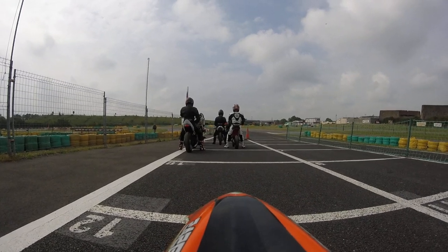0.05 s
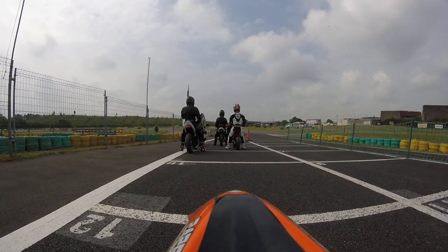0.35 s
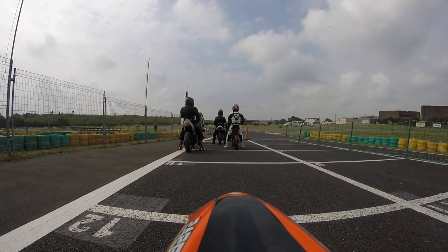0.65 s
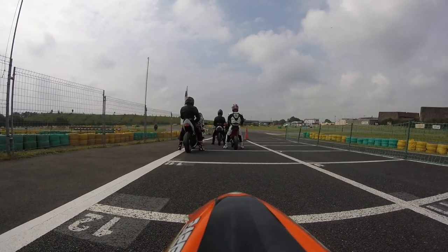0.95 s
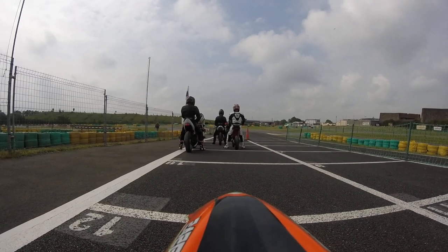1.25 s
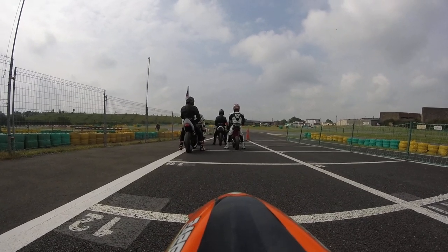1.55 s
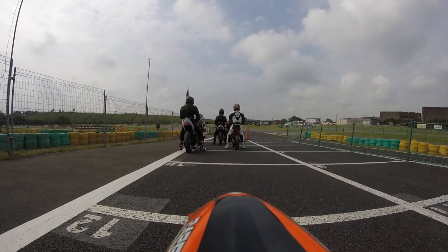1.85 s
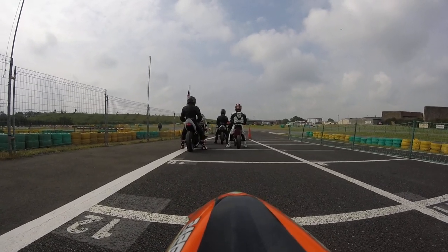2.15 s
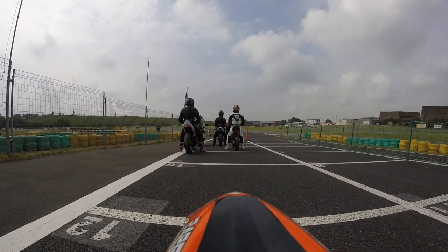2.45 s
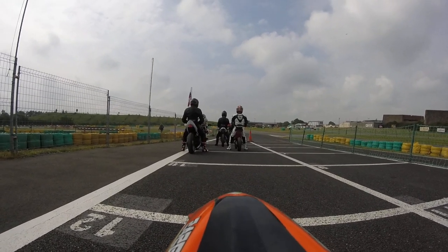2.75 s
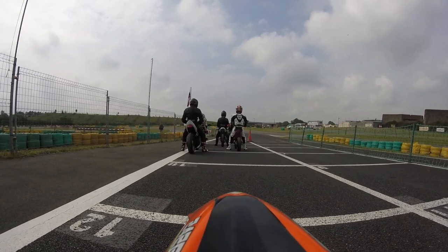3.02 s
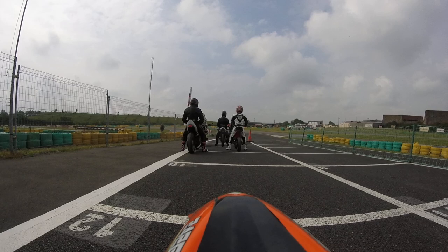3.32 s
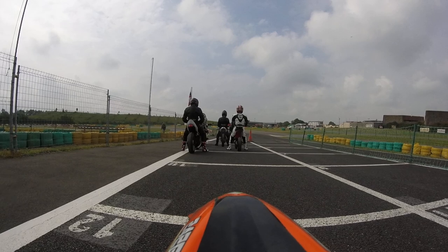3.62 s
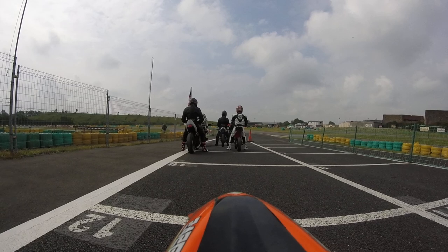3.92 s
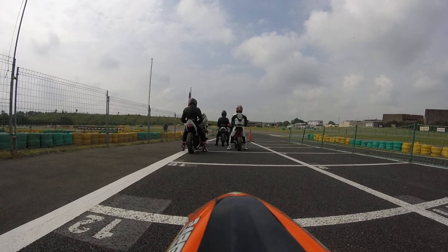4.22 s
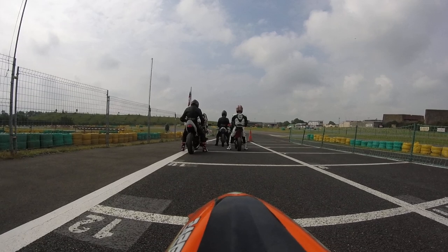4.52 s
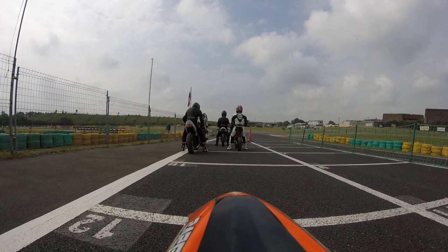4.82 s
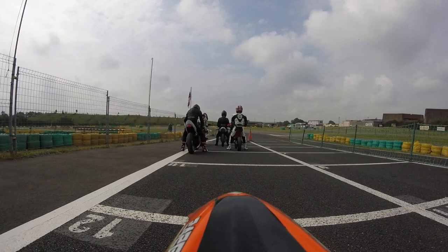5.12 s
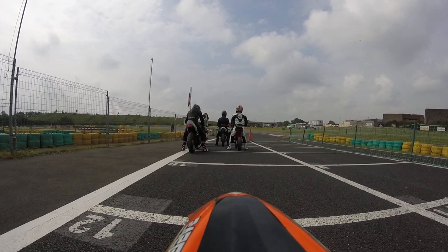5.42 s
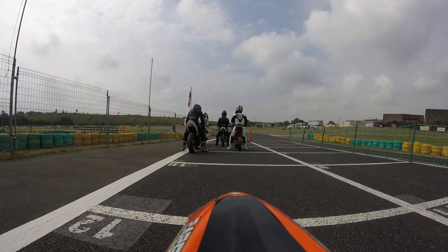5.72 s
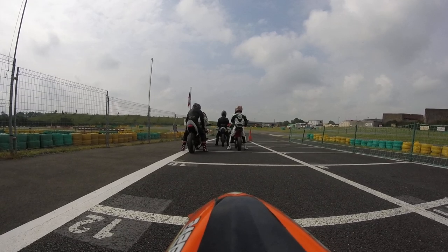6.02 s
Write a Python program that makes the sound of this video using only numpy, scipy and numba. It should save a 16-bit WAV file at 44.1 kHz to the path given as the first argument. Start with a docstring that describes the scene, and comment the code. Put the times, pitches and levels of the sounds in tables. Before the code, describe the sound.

A small one-cylinder motorcycle engine runs very close, heard from its front shell on an outdoor starting grid. Its idle is a fast metallic clatter with puffing exhaust and a low throb. At about 0.2 seconds comes the strongest rev: air rushes in, the pitch climbs and the bodywork booms, briefly pushing the other sounds down. As the revs fall, a short, thin hiss swells and stops at around 1 second. A light throttle blip follows at 1.4 seconds and a somewhat stronger one at 1.8 seconds, each with a low swell. By about 3 seconds the engine has dropped back to idle, and it keeps rattling and puffing evenly until the end at about 6 seconds. Throughout, a few other motorcycles putter more softly a short way ahead, each at its own slightly wandering speed.

```python
"""Pit bike on a starting grid

A small one-cylinder four-stroke bike idles and is revved three times; other bikes idle ahead.
Its valves and piston clatter, its exhaust puffs, and its shaking makes the fairing (the front
shell) boom. The limiter of a camera on that fairing turns everything down during the booms."""
import sys
import numpy as np
from scipy import signal
from scipy.fft import rfft, irfft, next_fast_len
from scipy.io import wavfile
from scipy.ndimage import uniform_filter1d, minimum_filter1d, map_coordinates
from numba import njit

SR = 44100
rng = np.random.default_rng(int(sys.argv[2]) if len(sys.argv) > 2 else 0)


def wav_record(signal):
    """Record a signal, one row per channel, as 16-bit PCM in the file named by sys.argv[1]."""
    frames = np.transpose(np.atleast_2d(signal))
    bounded = np.clip(frames, -1, 1)
    # unit amplitude maps onto the largest positive 16-bit level
    quanta = np.round(bounded * 32767).astype(np.int16)
    wavfile.write(sys.argv[1], SR, quanta)


N = 267687
IDLE_HZ = 48  # usual idle in turns per second; "revs" is the speed divided by this


def amp(db):
    """Turn decibels into a gain."""
    return 10 ** (np.asarray(db) / 20)


def unit(x):
    """Scale x to an average (rms) level of 1."""
    return x / np.sqrt(np.mean(x ** 2) + 1e-20)


def clock():
    """Each sample's time in seconds."""
    return np.arange(N) / SR


def curve(rows):
    """Join (seconds, value) points with straight lines."""
    return np.interp(clock(), *np.transpose(rows))


def lagged(x, seconds):
    """Follow x smoothly, a little late."""
    keep = np.exp(-1 / (seconds * SR))
    return signal.lfilter([1 - keep], [1, -keep], x)


def fading(impulses, decay):
    """Give each impulse a tail that falls 20 dB in decay seconds."""
    return signal.lfilter([1], [1, -10 ** (-1 / (decay * SR))], impulses)


def shaped(x, gain):
    """Filter x by gain(Hz), so that ringing comes after a hit, never before."""
    size = 2 * next_fast_len(N // 2 + SR // 4)
    hz = np.fft.rfftfreq(size, 1 / SR)
    cepstrum = irfft(np.log(np.maximum(gain(hz), 1e-6)))
    cepstrum[1:size // 2] *= 2
    cepstrum[size // 2 + 1:] = 0
    return irfft(rfft(x, size) * np.exp(rfft(cepstrum)))[:N]


def coloured(x, points):
    """Filter x along (Hz, dB) points; the result has level 1."""
    freqs, db = np.transpose(points)
    return unit(shaped(x, lambda hz: amp(np.interp(np.log(hz + 1), np.log(freqs), db))))


def ringing(x, modes):
    """Let x ring (Hz, width in Hz, dB) resonances; the result has level 1."""
    def gain(hz):
        peaks = (amp(db) / (1 + (2 * (hz - centre) / width) ** 2) for centre, width, db in modes)
        return np.sqrt(sum(peak ** 2 for peak in peaks))
    return unit(shaped(x, gain))


def firings(turns, offset, uneven_db, scatter_db):
    """One impulse every second turn, offset turns after firing; strong and weak ones alternate."""
    cycles = (turns - 1 - offset) / 2
    at = np.flatnonzero(np.diff(np.floor(cycles)) > 0)
    strong = np.cos(np.pi * cycles[at])
    return np.bincount(at, amp(uneven_db * strong + scatter_db * rng.standard_normal(len(at))), N)


def other_bikes():
    """Three engines putter ahead, each at its own wandering speed, blurred by distance."""
    # Their tone from behind. Each row: frequency in Hz, relative level in dB.
    tone = [(30, -33), (110, -14), (280, -11), (550, 13), (800, -24.5), (1250, -6.5), (1900, -33),
            (2600, -9), (5000, -31), (14000, -58.5)]
    total = np.zeros(N)
    for idle_hz in (51, 57, 63):
        drift = map_coordinates(rng.standard_normal(16), [clock() * 2])
        turns = np.cumsum(idle_hz * (1 + .03 * drift)) / SR
        pops = firings(turns, 0, uneven_db=-5.5, scatter_db=-0.5)
        total += amp(17) * pops + fading(pops, decay=.06) * rng.standard_normal(N)
    return amp(-35.5) * coloured(total, tone)


def hiss():
    """A short, thin hiss swells and stops as the first rev dies away."""
    # The hiss's tone. Each row: frequency in Hz, relative level in dB.
    tone = [(30, -100), (5000, -32), (5800, 1.5), (6700, -4), (8300, -6.5), (9500, -19.5), (14000, -25)]
    level_db = curve([(.8, -88), (.93, -57), (1.03, -47.5), (1.07, -66), (1.12, -100)])
    return amp(level_db) * coloured(rng.standard_normal(N), tone)


def crank(twist_s=.04, flywheel_s=.3, full_pull_hz=210):
    """Each twist of the grip opens the throttle; the heavy flywheel speeds up late, then coasts."""
    # The twists. Each row: start in seconds, seconds until let go, opening from 0 to 1.
    twists = [(0.188, 0.108, 0.922), (1.399, 0.163, 0.325), (1.84, 0.189, 0.524)]
    # Speed with the throttle shut, sagging after revs. Each row: time in seconds, turns per second.
    idle = [(0.0, 46.78), (0.99, 41.94), (1.19, 37.59), (1.58, 45.74), (1.85, 35.84), (2.4, 40.33),
            (2.7, 40.21), (2.78, 45.93), (3.0, 43.33), (3.55, 46.02), (3.72, 44.75), (4.04, 49.08),
            (4.54, 47.17), (5.12, 49.64), (5.34, 47.19), (5.6, 48.49), (6.07, 46.72)]
    throttle = sum(opening * np.interp(clock() - start, [0, twist_s, held, held + twist_s], [0, 1, 1, 0])
                   for start, held, opening in twists)
    speed = curve(idle) + full_pull_hz * lagged(throttle, flywheel_s)
    return throttle, speed


def intake(throttle):
    """Air roars through the airbox while the throttle is open."""
    return amp(-27) * throttle * ringing(rng.standard_normal(N), [(198, 92, -2), (302, 130, 0)])


def exhaust(turns, throttle, pop_db=23.5, flow_db=-11, rush_db=3.5):
    """Each firing gives a pop and a puff of swirling gas; an open throttle swells the puffs."""
    # Pipe and bodywork resonances. Each row: pitch in Hz, width in Hz, level in dB.
    pipe = [(150, 54, -17.5), (234, 28, -14), (301.1, 34.7, -8), (338, 180, -13), (427.1, 40.2, 1.5),
            (522, 86, -13), (621, 121, -17), (897.5, 81, -15), (1148, 175, -19), (1615, 78, -17.5)]
    pops = firings(turns, -.05, uneven_db=.4, scatter_db=.7)
    puffs = (fading(pops, decay=0.076) + amp(flow_db)) * rng.standard_normal(N)
    return ringing(amp(pop_db) * pops + amp(rush_db * throttle) * puffs, pipe)


def clatter(turns, knock_db, revs, level, dull_hz=2900):
    """Valves and piston strike the case at fixed points in each cycle, over whirring chain and gears."""
    # The hits. Each row: turns after firing, level in dB, fade in seconds, hardness from 0 to 1.
    hits = [(-.48, 3.5, .004, .1), (-.35, 6, .003, 0.03), (-.21, -8.5, 0.002, 0.53), (-.11, 2, 0.011, 0.6),
            (0.15, -11.5, 0.082, 1), (0.66, -4.5, 0.017, 0.55), (0.851, -8, 0.0028, 0.1)]
    # Resonances of the case and of the piston. Each row: pitch in Hz, width in Hz, level in dB.
    case_modes = [(1225, 252, -11.5), (1631, 123, -8.5), (2190, 144, -6), (2424, 170, 1), (2716, 106, 2.5),
                  (2811, 173, -3), (3080, 185, -10), (3585, 65, -14.5), (3998, 594, -18),
                  (4970, 200, -26.5), (5850, 530, -34.5), (6450, 620, -36), (7500, 1700, -46),
                  (9600, 2700, -51.5)]
    piston_modes = [(2354, 157, 5), (2758, 170, 1.5), (3205, 210, -1), (4074, 623, -20)]
    hard, soft = amp(-18), amp(-14)  # the steady whirr
    for offset, db, decay, hardness in hits:
        blow = amp(db) * fading(firings(turns, offset, uneven_db=-0.3, scatter_db=2.2), decay)
        hard += hardness * blow
        soft += (1 - hardness) * blow
    # the piston slaps the cylinder wall just before firing, harder at low speed, and rattles briefly
    slaps = amp(8.5) * revs ** -0.8 * firings(turns, -0.155, uneven_db=1.5, scatter_db=0.56)
    slaps += amp(-7) * fading(slaps, decay=0.0062) * rng.standard_normal(N)
    # soft hits leave the highest resonances alone
    lowpass = signal.butter(4, dull_hz, fs=SR, output="sos")
    dull = signal.sosfilt(lowpass, soft * rng.standard_normal(N))
    sharp = amp(knock_db) * (slaps + hard * rng.standard_normal(N))
    case = ringing(level * (dull + sharp), case_modes)
    piston = ringing(level * amp(knock_db) * slaps, piston_modes)
    return case + amp(-9.5) * piston


def fairing(turns, revs, ring_hz=77.7, width_hz=3.8):
    """The piston shakes the bike once and twice a turn; the fairing rings on and throbs against it."""
    # Higher hums that emerge at speed. Each row: multiple of the engine speed, level at idle in dB.
    hums = [(2.5, -52), (3, -51), (4, -47), (5, -52)]
    angle = 2 * np.pi * (turns - 1)
    shake = amp(-19.5) * revs ** 2.54 * np.cos(angle) + amp(-24.0) * revs ** 3.7 * np.cos(2 * angle)
    # uneven firings kick the frame too, adding rumble between the tones
    kicks = amp(25.5) * firings(turns, 0, uneven_db=2.5, scatter_db=1.69)
    kicks = signal.sosfilt(signal.butter(2, [36, 160], "band", fs=SR, output="sos"), kicks)
    keep = np.exp(-np.pi * width_hz / SR)
    spring = [1, -2 * keep * np.cos(2 * np.pi * ring_hz / SR), keep * keep]
    boom = signal.lfilter([sum(spring)], spring, shake + kicks)
    drone = revs ** 4 * sum(amp(db) * np.cos(multiple * angle) for multiple, db in hums)
    # no two turns are alike
    flutter_db = 2.5 * map_coordinates(rng.standard_normal(int(turns[-1]) + 2), [turns])
    return drone * amp(flutter_db) - boom


def scene():
    """Speed and throttle drive the near bike's sounds: faster and wider open is louder."""
    # How hard the fuel burns, lifting knock and exhaust. Each row: time in seconds, strength in dB.
    burn = [(0, 2), (.6, -0.5), (1.2, -3), (1.6, -1), (2.3, 1), (2.9, -1.5), (4, 1.5), (6.07, 1.7)]
    burn_db = curve(burn)
    knock_db = 0.5 * burn_db
    throttle, speed = crank()
    charge = lagged(throttle, seconds=.07)  # the cylinder takes a moment to fill
    turns = np.cumsum(speed) / SR
    revs = speed / IDLE_HZ
    metal = amp(-19.0) * clatter(turns, knock_db, revs, level=revs ** 1.3 * amp(3.0 * charge + knock_db))
    gas = amp(0.63 * burn_db - 22.0) * revs ** .4 * exhaust(turns, charge)
    return (fairing(turns, revs) + metal + gas + intake(throttle) + other_bikes() + hiss())[None]


@njit
def recovering(needed, step):
    """The gain drops at once to what is needed and creeps back towards 1."""
    gain, now = np.empty_like(needed), 1.0
    for i in range(len(needed)):
        now = min(needed[i], now + (1 - now) * step)
        gain[i] = now
    return gain


def record(dry, ceiling_db=-7.5, release_s=0.39, top_hz=15000):
    """The camera's limiter turns loud moments down, holds and lets go; the highest treble is cut."""
    level = uniform_filter1d(np.abs(dry[0]), size=160)
    needed = amp(ceiling_db) / np.maximum(level, amp(ceiling_db))
    held = minimum_filter1d(needed, size=1801, origin=900, mode="nearest")
    gain = recovering(held, 1 / (release_s * SR))
    limited = dry * uniform_filter1d(gain, size=400)
    return signal.sosfilt(signal.butter(12, top_hz, fs=SR, output="sos"), limited)


dry = scene()
out = record(dry)
wav_record(out)
```